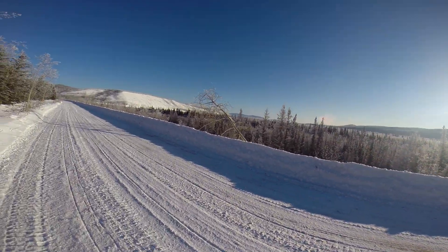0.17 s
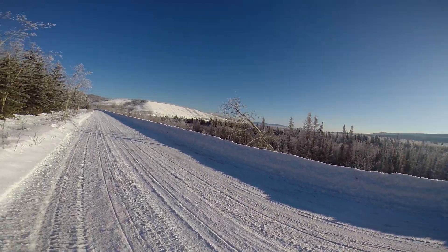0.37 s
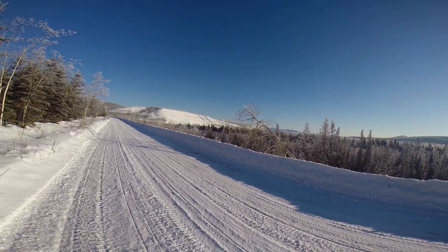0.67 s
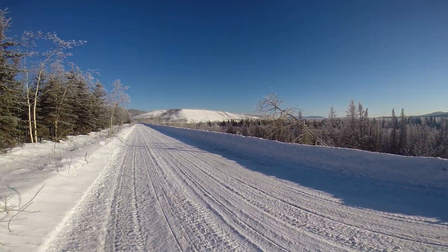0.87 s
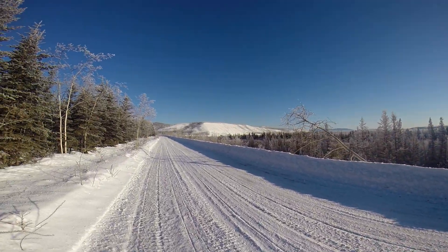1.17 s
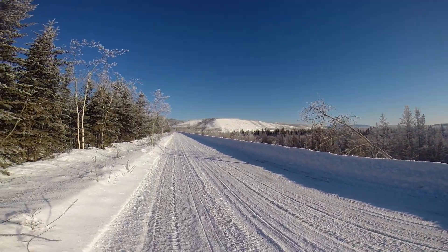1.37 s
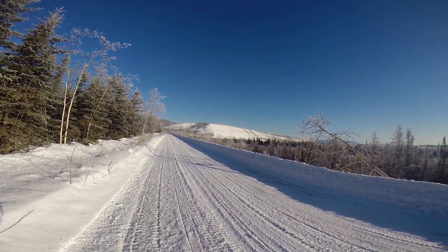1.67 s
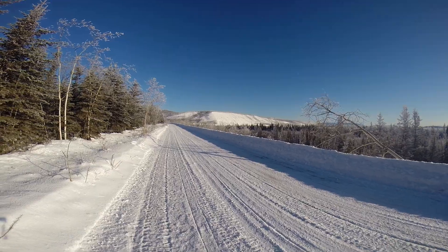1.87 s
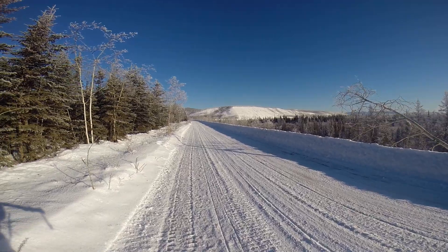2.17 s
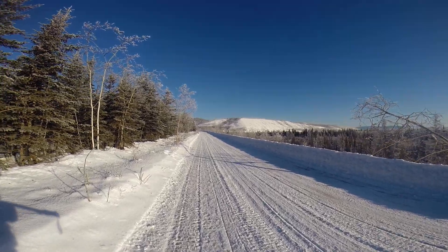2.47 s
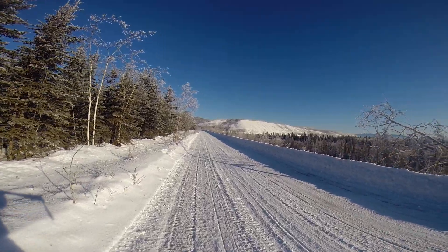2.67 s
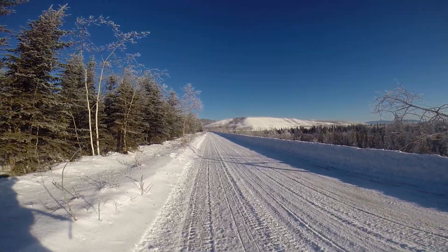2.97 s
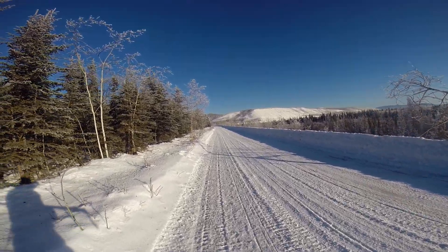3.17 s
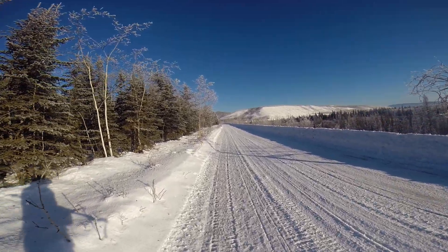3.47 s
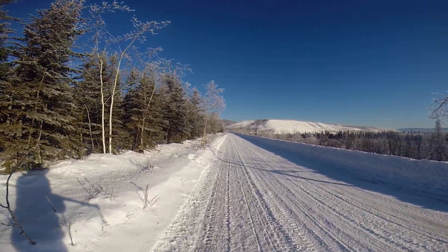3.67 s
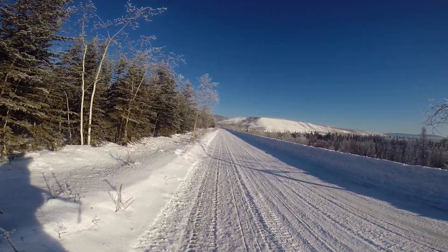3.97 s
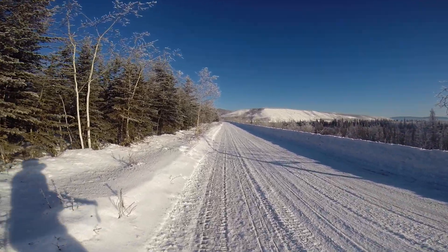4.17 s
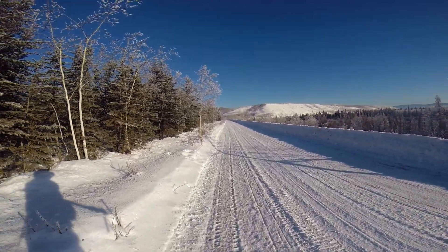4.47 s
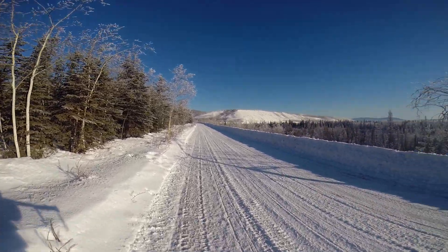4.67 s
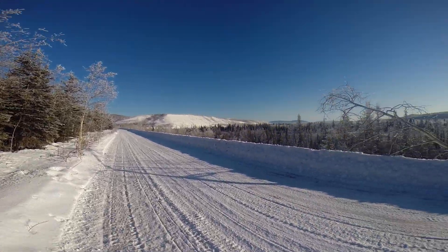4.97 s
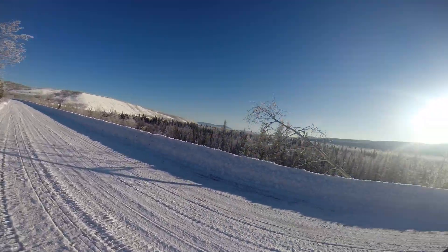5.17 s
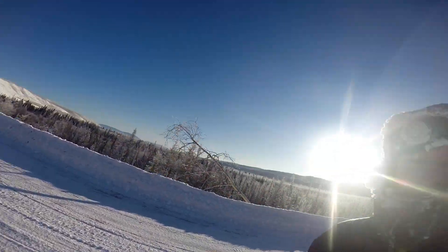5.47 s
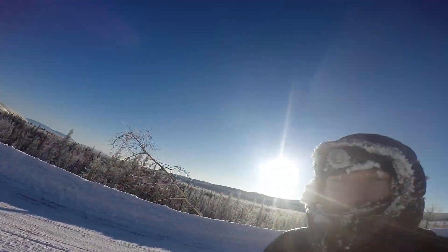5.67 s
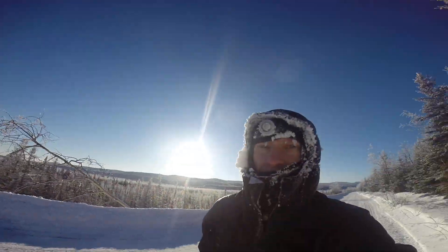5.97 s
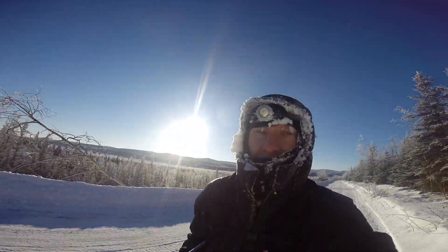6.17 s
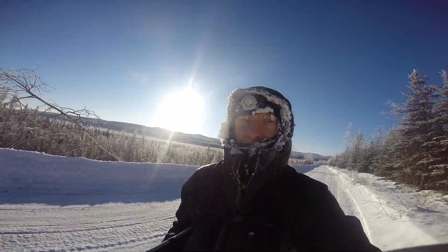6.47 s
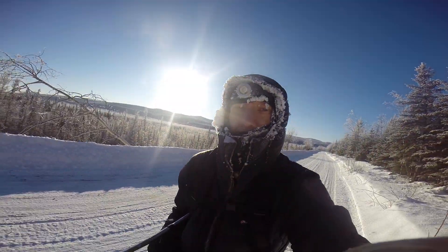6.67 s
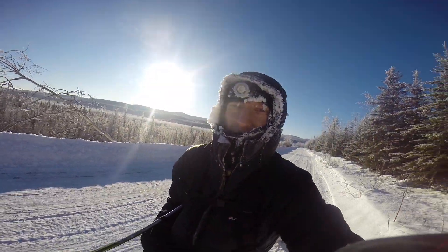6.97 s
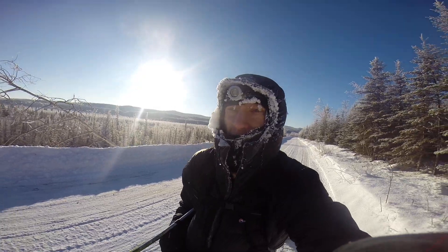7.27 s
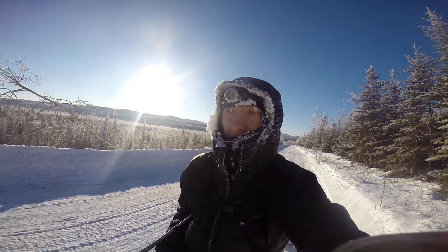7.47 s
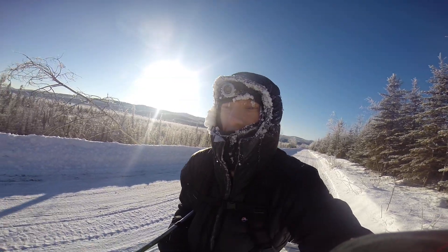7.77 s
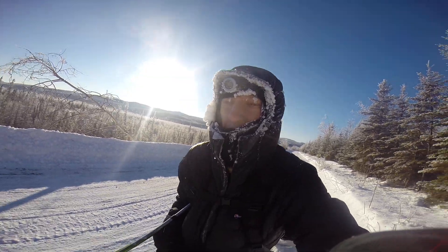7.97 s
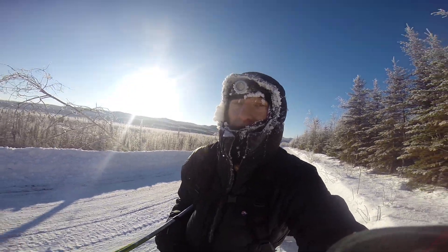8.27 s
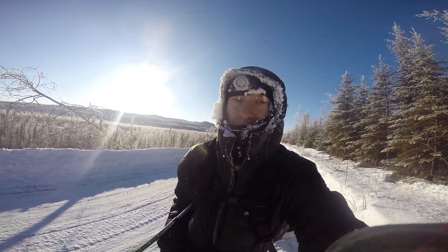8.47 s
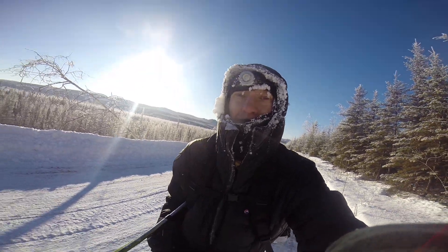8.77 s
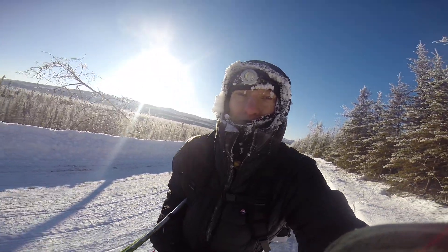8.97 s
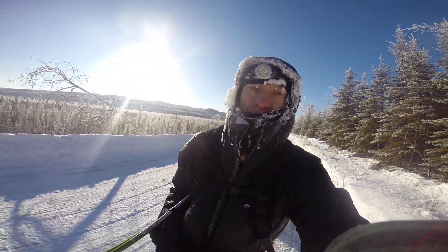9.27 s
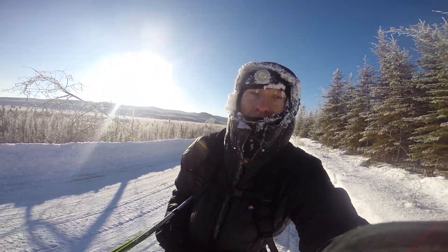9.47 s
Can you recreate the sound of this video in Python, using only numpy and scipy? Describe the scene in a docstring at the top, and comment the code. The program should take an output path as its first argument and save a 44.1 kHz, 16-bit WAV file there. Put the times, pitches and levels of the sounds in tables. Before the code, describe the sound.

The sound is close and boxy, ringing in the midrange as if sealed inside a plastic camera case on a pole. From 0 to 1 s boots crunch hard snow, with a few sharp taps and low jolts over a faint grainy sled hiss. At 1.1-1.45 s the glove rubs firmly in short strokes. From 1.5 to 3 s it is quieter: soft crunches, isolated crackles, one knock at 2.6. Between 3.1 and 4.35 s hard plastic clacks come in irregular clusters, with low shakes. From 4.6 to 6.8 s the glove scrapes and squeaks, peaking near 4.9, 5.9 and 6.35, with ticks and a strong thump at 5.4; low wind rumble swells. After 6.9 s it calms: light crisp steps, crackles and dull bumps until about 9.6, a low gust near 9.3, faint electronic hiss and thin high whine throughout.

```python
"""Sled on frozen snow, heard from inside a camera case

A walker drags a sled over packed snow, a small camera in a sealed plastic case held on a pole.
Sled hiss, boot crunch and the close rub of a glove are flickering noise rung by the case's modes.
Single crackles, glove ticks and mount knocks are short bursts of grit ringing the same case;
pole jolts are damped low swings, wind and sway are low noise, and the electronics hiss and whine."""
import sys
import numpy as np
from scipy import signal
from scipy.fft import rfft, irfft
from scipy.io import wavfile
from scipy.ndimage import uniform_filter1d

SR = 44100
rng = np.random.default_rng(int(sys.argv[2]) if len(sys.argv) > 2 else 0)


def dump_mix(stems):
    """Bounce the given channels to the path in sys.argv[1] as a 16-bit WAV at rate SR."""
    frames = np.atleast_2d(stems).T  # one column per channel
    limited = np.clip(frames, -1, 1)  # hard clip at full scale
    pcm = np.round(limited * 32767).astype(np.int16)
    wavfile.write(sys.argv[1], SR, pcm)


N = 424239  # samples

# Resonances of the plastic case, with relative strengths by where the sound comes in:
# mode_hz, width_hz, behind_lens_db, in_front_db, rubbed_db, knocked_db
CASE_MODES = [(870, 93, -37, -19.5, -11.5, 17), (1560, 285, 2, -8.5, -32, 19.5),
              (2120, 220, 0, -8, -5.5, 22), (2453, 590, -0.5, -13, -10.5, -16),
              (2735, 730, 0.5, -13.5, -33, 8.5), (3595, 620, -10.5, -14.5, -22, -41),
              (4100, 570, -10, -22.5, -18, -5.5), (5400, 740, -9, -42, -19.5, -9),
              (5890, 1880, -11, -27, -24.5, -15.5), (7360, 610, -45, -35, -24, -58.5),
              (9200, 2100, -23.5, -49, -37, -59), (11600, 3300, -28, -46, -41, -57)]
# The camera swings round to face the walker: time_s, turned_share (0-1)
CAMERA_TURN = [(5.0, 0), (6.0, 1)]


def gain_of(db):
    """Decibels to amplitude gain."""
    return 10 ** (np.asarray(db) / 20)


def evened(x):
    """Scales to rms 1."""
    return x / np.sqrt(np.mean(x ** 2) + 1e-20)


def read(points, hz):
    """Reads a spectrum table at the given frequencies, on a log frequency scale."""
    table_hz, value = np.transpose(points)
    return np.interp(np.log(hz + 1), np.log(table_hz + 1), value)


def curve(rows):
    """Joins the points of a time table by straight lines, one value per sample."""
    times_s, values = np.transpose(rows)
    return np.interp(np.arange(N) / SR, times_s, values)


def add(mix, start_s, sound):
    """Mixes a sound in at start_s, cut off at the end of the mix."""
    part = mix[round(start_s * SR):][:len(sound)]
    part += sound[:len(part)]


def coloured(x, points):
    """Shapes x by a spectrum table, then scales it to rms 1."""
    gain = gain_of(read(points, np.fft.rfftfreq(N, 1 / SR)))
    return evened(irfft(rfft(x) * gain, N))


def chance(ms):
    """Random drift of rms 1: noise averaged twice over ms milliseconds."""
    size = max(int(ms * SR / 1000), 1)
    once = uniform_filter1d(rng.standard_normal(N), size)
    return evened(uniform_filter1d(once, size))


def case_ring(column, tilt_db=0, spot_db=0, shift=1, damp=1):
    """Causal response of the case: mode peaks over the wall, with the phase that such a shape implies.
    The spot struck raises, lowers or shifts each mode; damp widens the peaks; tilt_db is per octave."""
    # What the wall passes between the modes: freq_hz, level_db
    wall = [(60, -3), (300, -17), (1100, -17.5), (2000, -9.5), (4700, -28.5), (15000, -59.5)]
    hz = abs(np.fft.fftfreq(4096, 1 / SR))
    modes = np.transpose(CASE_MODES)
    detune = 2 * (hz[:, None] - shift * modes[0]) / (damp * modes[1])
    peaks = gain_of(modes[column] + spot_db) / (1 + detune ** 2)
    power = (peaks ** 2).sum(1) + gain_of(read(wall, hz)) ** 2
    tilt = gain_of(tilt_db * np.log2(np.maximum(hz, 1000) / 2000))  # flat below 1 kHz
    log_gain = np.log(np.sqrt(power) * tilt)
    minimum_phase = -signal.hilbert(log_gain).imag
    ring = np.fft.ifft(np.exp(log_gain + 1j * minimum_phase)).real[:2048]
    return ring / np.linalg.norm(ring)


def crackle(spot_db):
    """A crust breaks: a few milliseconds of grit ringing the case, peak 1."""
    t = np.arange(700) / SR
    envelope = np.exp(-t / 0.003) * (1 - np.exp(-t / 0.0004))
    grit = rng.standard_normal(len(t)) * envelope
    out = signal.fftconvolve(grit, case_ring(column=3, spot_db=spot_db))
    return out / abs(out).max()


def swell(full_s, rise_s, hold_s, fall_s, db, flat):
    """Power of one event that builds up, holds and dies away; higher flat = rounder top, steeper sides."""
    edge_db = -15  # how far it has sunk at the ends of its build-up and die-away
    t = np.arange(N) / SR - full_s
    away = np.maximum(np.maximum(-t / rise_s, (t - hold_s) / fall_s), 0)
    return gain_of(db + edge_db * np.minimum(away, 5) ** flat) ** 2


def effort():
    """Adds sled, boot and glove power: level, boot and glove shares, power-weighted treble and low-mid."""
    # Hiss of the sled runners: time_s, level_db
    runners = [(0.0, -49), (1.5, -51), (2.3, -60), (2.8, -57.5), (3.3, -62.5), (3.75, -49), (4.0, -61),
               (4.5, -56.5), (5.7, -47), (7.1, -55), (7.9, -56), (8.4, -56), (9.62, -56)]
    # Boots crush the crust: full_from_s, rise_s, hold_s, fall_s, level_db, treble_against_level_db
    boots = [(0.01, 0.36, 0.046, 0.044, -39, -11), (0.26, 0.19, 0.017, 0.17, -42, -6),
             (0.511, 0.04, 0.02, 0.022, -47.5, -5), (0.685, 0.083, 0.034, 0.084, -53, 2),
             (0.987, 0.065, 0.011, 0.012, -41.5, -16.5), (1.864, 0.018, 0.15, 0.086, -50, -13),
             (2.454, 0.072, 0.1, 0.0054, -46, -15), (2.966, 0.061, 0.2, 0.015, -50.5, -13.5),
             (3.53, 0.029, 0.022, 0.033, -42, -15), (4.092, 0.1, 0.079, 0.14, -43, -14),
             (6.948, 0.014, 0.039, 0.012, -50.5, -1), (7.487, 0.094, 0.14, 0.13, -49.5, -0.5),
             (7.806, 0.027, 0.018, 0.054, -52, -7), (8.106, 0.034, 0.065, 0.047, -47.5, -4.5),
             (8.391, 0.013, 0.021, 0.016, -48.5, -5), (8.605, 0.11, 0.16, .04, -48, -1.5),
             (8.895, 0.065, 0.036, 0.032, -52, -4), (9.198, 0.084, 0.037, 0.046, -46.5, -2.5),
             (9.333, 0.06, 0.017, 0.022, -48, -11.5)]
    # The glove slides over the case: full_from_s, rise_s, hold_s, fall_s, level_db,
    # treble_against_level_db, low_mid_against_level_db
    glove = [(1.118, 0.039, 0.041, 0.045, -34, -18, -12.5), (1.213, 0.013, 0.1, 0.042, -30, -21.5, -15.5),
             (1.387, 0.045, 0.035, 0.0091, -30.5, -23, -9.5),
             (3.635, 0.031, 0.034, 0.028, -36.5, -13.5, -5), (4.34, 0.0053, 0.056, 0.045, -36, -13, -3),
             (4.531, 0.024, 0.015, 0.04, -46, -12, -4.5), (4.653, 0.035, 0.057, 0.067, -38, -13, -5),
             (4.754, 0.12, 0.14, .05, -41.5, -6.5, 1), (4.916, 0.011, 0.028, 0.036, -27, -6, -5.5),
             (5.132, 0.31, 0.041, 0.033, -44.5, -7, 4.5), (5.288, 0.054, 0.057, 0.027, -39.5, -6, -2.5),
             (5.457, 0.04, 0.017, 0.13, -33, -6, -2), (5.553, 0.018, 0.015, 0.09, -37, -3, -8),
             (5.868, 0.057, 0.012, 0.045, -24, -6.5, -8.5), (5.989, 0.03, 0.029, 0.089, -35, -7, -9),
             (6.182, 0.096, 0.098, 0.071, -42, -6, -3), (6.353, 0.18, 0.025, 0.037, -27.5, -8.5, -15),
             (6.423, 0.054, .11, 0.027, -41, -7, -5.5), (6.614, 0.055, 0.052, 0.051, -34.5, -9.5, -10),
             (6.735, 0.023, 0.01, 0.057, -43, -6.5, -6.5)]
    # Balance against level: behind_lens_db, in_front_db
    sled_treble = (-12, -7)
    snow_low_mid = (-2, -6)

    turned = curve(CAMERA_TURN)
    sled = gain_of(curve(runners)) ** 2
    steps = np.array([swell(*row[:5], flat=1.5) for row in boots])
    rubs = np.array([swell(*row[:5], flat=1.3) for row in glove])
    stepped = steps.sum(0)
    snow = sled + stepped
    power = snow + rubs.sum(0)

    sled_db, snow_db = (a + (b - a) * turned for a, b in (sled_treble, snow_low_mid))
    step_treble, rub_treble = np.transpose(boots)[-1], np.transpose(glove)[-2]
    treble_db = sled * sled_db + step_treble @ steps + rub_treble @ rubs
    low_db = snow * snow_db + np.transpose(glove)[-1] @ rubs
    level_db = 10 * np.log10(power)
    return level_db, stepped / power, 1 - snow / power, treble_db / power, low_db / power


def patchy(x, db):
    """The contact wanders, so each region of the spectrum swells and sinks by itself."""
    z = signal.stft(x, nperseg=256)[2]
    across_bins = uniform_filter1d(rng.standard_normal(z.shape), 3, 0)
    patches = evened(uniform_filter1d(across_bins, 9, 1))
    depth_db = np.resize(db[::128], z.shape[1])  # one depth per 128-sample hop
    return evened(signal.istft(z * gain_of(depth_db * patches), nperseg=256)[1][:N])


def scrape():
    """Sled, boots and glove: dense fizz with crackles, snow from afar and the glove right on the case."""
    # How much the glove rubs the back of the case: time_s, back_share (0-1)
    grip = [(1.45, 0.5), (4.0, 0.51), (6.1, 0.28)]
    merge = 0.75  # share of the crackles that a boot's weight or the glove merges into fizz
    crackles_per_s, spots = 140, 16
    level_db, stepped, rubbed, treble_db, low_db = effort()
    turned = curve(CAMERA_TURN)

    # a thin squeak is even, a full-bodied rub stutters
    gritty = np.clip(1 + 0.05 * low_db * rubbed, 0.25, 1)
    slow_db = 1.6 * gritty * chance(12)
    fizz = rng.standard_normal(N)
    fizz = fizz * gain_of(slow_db + 2.0 * np.sqrt(gritty) * chance(2.47))
    behind, facing, near = (evened(signal.oaconvolve(fizz, case_ring(column=c))[:N]) for c in (2, 3, 4))
    # a grip on the back raises the modes; this fizz is 20 ms apart from the rest
    stiff = signal.oaconvolve(np.roll(fizz, SR // 50), case_ring(column=4, shift=1.1))[:N]
    back = evened(0.7 * behind + evened(stiff))

    # crackles of random size, each ringing the case at one of a few random spots
    size = gain_of(6.0 * np.minimum(rng.exponential(1, N), 2.5))
    size = size * (rng.random(N) < crackles_per_s / SR)
    spot = rng.integers(0, spots, N)
    crust = np.zeros(N)
    for k in range(spots):
        ring = crackle(5.5 * rng.standard_normal(len(CASE_MODES)))
        crust += signal.oaconvolve(size * (spot == k), ring)[:N]

    snow = (1 - turned) * behind + turned * facing
    rub = near + curve(grip) * (back - near)
    dense = np.sqrt(1 - rubbed) * snow + np.sqrt(abs(rubbed)) * rub
    dense = patchy(dense, db=2 * gritty)
    # an even rub on the front gathers in the main modes
    squeak_band = signal.butter(2, (1950, 2700), "band", fs=SR, output="sos")
    squeak = signal.sosfiltfilt(squeak_band, dense)
    dense = dense + (1 - gritty) * turned * (squeak - 0.43 * dense)

    # in a loud scrape the crackles come so thick that they merge into the fizz; clearer from in front
    apart = np.clip((-25.5 - level_db) / 16, 0, 1)
    apart = apart * (0.83 + 0.5 * turned) * (1 - merge * (stepped + rubbed))
    sound = (dense + apart * evened(crust)) / np.sqrt(1 + apart ** 2)

    # the level sets the band of the main modes; low-mid and treble are set against it
    low = signal.sosfiltfilt(signal.butter(5, 1270, fs=SR, output="sos"), sound)
    high = signal.sosfiltfilt(signal.butter(3, 3200, "high", fs=SR, output="sos"), sound)
    main = evened(sound - low - high)
    outer = gain_of(treble_db) * evened(high) + gain_of(low_db) * evened(low)
    return gain_of(level_db) * (main + outer)


def electronics():
    """Steady noise of the camera's electronics, with thin constant sine tones."""
    # Relative hiss spectrum: freq_hz, density_db
    hiss_shape = [(150, -26), (400, -1.5), (1100, -10.5), (5000, -14.5), (10000, -23), (15300, -33)]
    # Whine tones: pitch_hz, rms_level_db
    whine = [(5846, -79), (11719, -85), (14626, -83)]
    hiss_db = -65  # rms
    t = np.arange(N) / SR
    tones = np.zeros(N)
    for hz, db in whine:
        tones += gain_of(db) * np.sqrt(2) * np.sin(2 * np.pi * (hz * t + rng.random()))
    return gain_of(hiss_db) * coloured(rng.standard_normal(N), hiss_shape) + tones


def jolt(ms, hz, width_hz):
    """A smooth push on the pole, then its low resonance swings on; a greater width damps it sooner."""
    push = np.hanning(max(int(ms * SR / 1000), 8))
    t = np.arange(SR // 8) / SR
    swing = np.exp(-np.pi * width_hz * t) * np.cos(2 * np.pi * hz * t)
    out = signal.fftconvolve(np.diff(push, prepend=0), swing)
    return out / abs(out).max()


def pole():
    """Clear jolts, many small ones at random, and lumpy low pressure from wind and swing."""
    # Dull jolts along the pole: start_s, peak_db, push_ms
    clear_jolts = [(0.026, -25, 4), (0.057, -27, 1.2), (0.373, -24, 1.1), (1.047, -30, 3.4),
                   (1.337, -24.5, 2.05), (2.456, -39, 4.8), (3.059, -37, 1.4), (4.792, -26, 2.9),
                   (5.2277, -28.5, 5.7), (5.394, -17, 3.7), (5.5492, -21, 1.4), (7.28, -34, 3.6),
                   (7.373, -34.5, 4.3), (7.528, -32.5, 4.8), (7.578, -27.5, 6), (7.732, -33, 4.4),
                   (7.8014, -27, 5.3), (7.978, -35, 4), (8.0243, -31, 4.9), (8.196, -30.5, 5.4),
                   (8.303, -32.5, 4.6), (8.4061, -26, 4.1), (8.579, -31.5, 5.2), (8.7677, -32.5, 4.6),
                   (8.907, -23.5, 4.1)]
    # Slow pressure of wind and swing: time_s, level_db
    sway = [(0.0, -46.5), (1.4, -44.5), (2.4, -49.5), (3.0, -48.5), (3.7, -45.5), (4.6, -45.5), (4.95, -38),
            (5.6, -36.5), (6.0, -38), (6.4, -34), (7.06, -40.5), (7.25, -42.5), (7.6, -42), (8.5, -41.5),
            (9.1, -45.5), (9.24, -48), (9.31, -36), (9.62, -45)]
    # Relative spectrum of that pressure: freq_hz, level_db
    sway_shape = [(8, 0.5), (20, 1.5), (40, -6), (80, -16.5), (160, -29), (400, -34.5), (1000, -59)]
    middle_hz, small_per_s = 84, 40  # pole resonance, about which each clear jolt varies; small jolts
    out = np.zeros(N)
    draws = rng.uniform(-1.3, 1, (len(clear_jolts), 3))
    for (start_s, db, ms), (way, grip, late) in zip(clear_jolts, draws):
        swing = jolt(ms, middle_hz * (1 + 0.25 * grip), width_hz=55)
        bump = np.sign(way) * gain_of(db) * swing
        add(out, start_s, bump)
        add(out, start_s + 0.00202, gain_of(db - 11) * crackle(5 * way))  # the joint creaks with it
        # smaller rebounds follow, either way up
        add(out, start_s + 0.014 + 0.006 * late, 0.3 * grip * bump)
        add(out, start_s + 0.035 + 0.015 * grip, 0.3 * late * bump)

    small = rng.standard_normal(N) * (rng.random(N) < small_per_s / SR)
    patter = gain_of(-8) * signal.oaconvolve(small, jolt(5.13, middle_hz, width_hz=30))[:N]
    lumps = coloured(rng.standard_normal(N), sway_shape) * gain_of(2.0 * chance(75))
    return out + gain_of(curve(sway)) * (lumps + patter)


def crackles():
    """Single breaks of the crust that stand out, each favouring the modes near its own pitch."""
    # start_s, peak_db, favoured_pitch_hz
    breaks = [(0.0254, -28, 1740), (0.413, -21.5, 2340), (1.25, -26, 2456), (1.396, -25.5, 2400),
              (2.1134, -31, 1560), (2.859, -37, 2480), (3.204, -35.5, 1550), (3.7447, -22.5, 2290),
              (4.3245, -39, 2700), (4.348, -34, 1800), (4.371, -27, 2200), (5.163, -23.5, 2150),
              (5.121, -25.5, 2370), (5.1875, -24, 2210), (5.268, -27.5, 2140), (5.466, -16.5, 2550),
              (5.618, -24.5, 2700), (7.578, -28.5, 1560), (8.112, -30.5, 1520), (8.4243, -25.5, 1430),
              (8.772, -34, 2000), (8.8297, -32.5, 2120), (9.195, -29, 2270), (9.3772, -37, 2690)]
    out = np.zeros(N)
    mode_hz = np.transpose(CASE_MODES)[0]
    for start_s, db, hz in breaks:
        spot_db = 9.7 * np.exp(-((mode_hz - hz) / 300) ** 2)
        add(out, start_s, gain_of(db) * crackle(spot_db))
    return out


def knocks():
    """The mount taps the case: a hard tap with tiny rebounds rings a new spot and shakes the pole."""
    # start_s, ring_peak_db, jolt_peak_db, treble_tilt_db_per_octave
    mount_knocks = [(0.2655, -22, -20.5, 13), (0.406, -12.5, -22, 10.5), (0.599, -21, -22.5, -1),
                    (2.6351, -22, -29.5, 11.5), (3.1352, -25.5, -20, 5), (3.2984, -19, -21, 3),
                    (3.3582, -16, -22, 1), (3.461, -12.5, -19.5, 7), (3.5062, -16, -19, 5.5),
                    (3.6125, -11.5, -20, 5.5), (3.916, -18, -15, 13.5), (4.128, -11, -13.5, 9.5),
                    (4.178, -16, -16.5, 8), (4.2519, -18, -16, 9), (4.2802, -19, -17, 7.5),
                    (4.3373, -16, -15.5, 9), (4.6983, -19, -25, -2), (4.711, -21, -24, 1)]
    swing_hz, gap_hz = 74, 1010  # middle of the varying pole swing; where wall and pole cancel
    out, t = np.zeros(N), np.arange(900) / SR
    for start_s, db, jolt_db, tilt_db in mount_knocks:
        tap = 0.12 * rng.standard_normal(len(t)) * np.exp(-t / 0.005)  # rebounds
        tap[:11] += np.hanning(11)  # first contact
        shift = 1 + 0.025 * rng.standard_normal(len(CASE_MODES))
        spot_db = 2.5 * rng.standard_normal(len(CASE_MODES))
        response = case_ring(column=5, tilt_db=tilt_db, spot_db=spot_db, shift=shift, damp=1.2)
        ring = signal.fftconvolve(tap, response)
        add(out, start_s, -gain_of(db) * ring / abs(ring).max())
        shake = jolt(1.3, swing_hz * shift[0] ** 2, width_hz=24)
        add(out, start_s, -gain_of(jolt_db) * shake)
    return signal.lfilter(*signal.iirnotch(gap_hz, 5, SR), out)


def ticks():
    """The stiff glove lets go of the plastic: a millisecond of bright grit, too quick for the low modes."""
    # start_s, peak_db
    releases = [(4.8217, -28.5), (4.9563, -18), (4.967, -20), (5.482, -23)]
    out, t = np.zeros(N), np.arange(300) / SR
    for start_s, db in releases:
        grit = rng.standard_normal(len(t)) * np.exp(-t / 0.001)
        ring = signal.fftconvolve(grit, case_ring(column=2, tilt_db=5.5))
        add(out, start_s, gain_of(db) * ring / abs(ring).max())
    return out


def scene():
    """All sources at the single microphone inside the case."""
    mix = scrape() + crackles() + ticks() + knocks() + pole() + electronics()
    return mix[None]


def record(dry):
    """Limits the band with a steep linear-phase low-pass."""
    edge_hz = 15350
    low_pass = signal.firwin(511, edge_hz, window=("kaiser", 9), fs=SR)
    return signal.oaconvolve(dry, low_pass[None], "same")


dry = scene()
out = record(dry)
dump_mix(out)
```